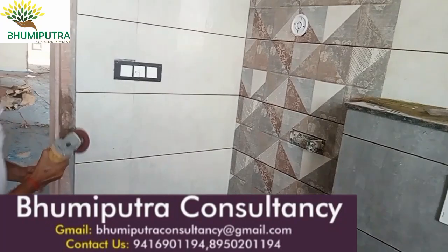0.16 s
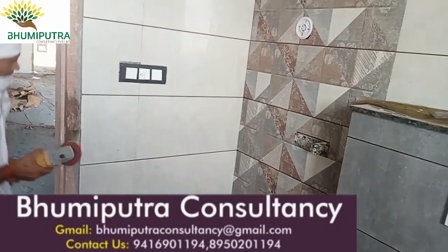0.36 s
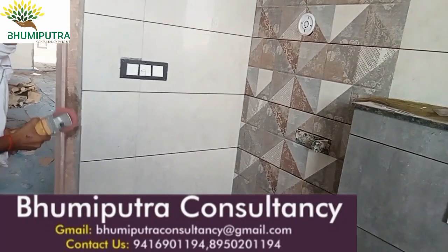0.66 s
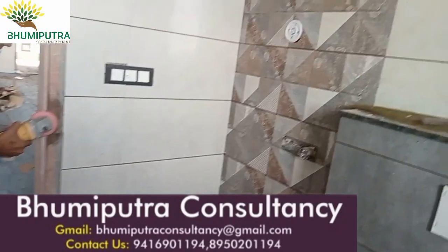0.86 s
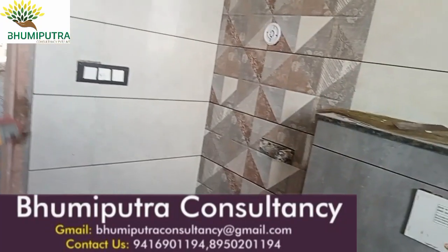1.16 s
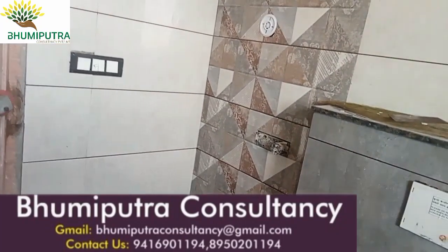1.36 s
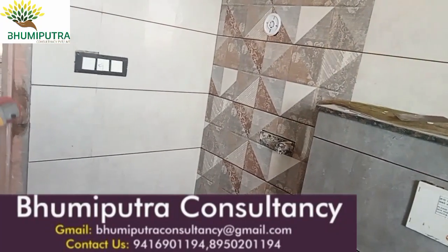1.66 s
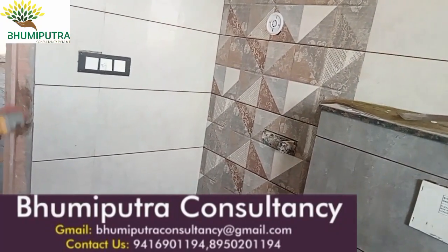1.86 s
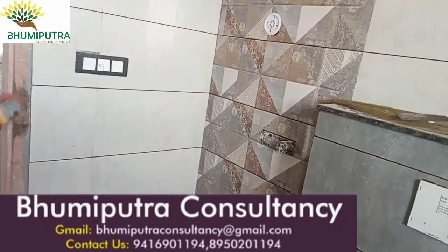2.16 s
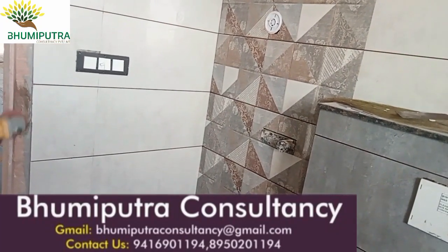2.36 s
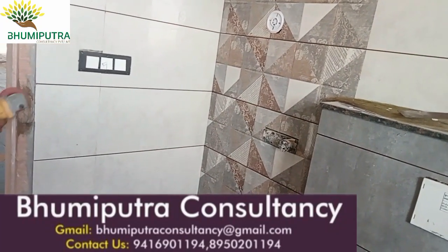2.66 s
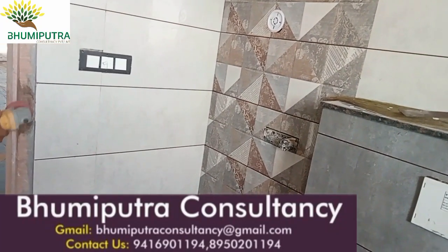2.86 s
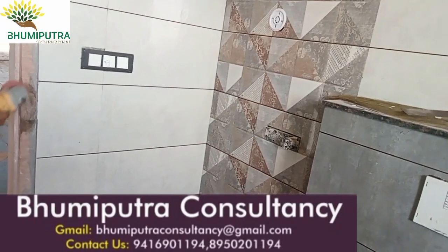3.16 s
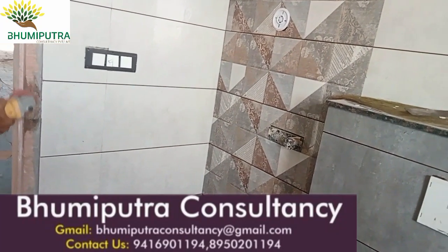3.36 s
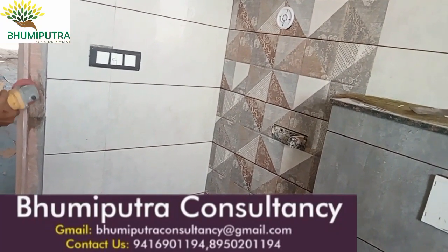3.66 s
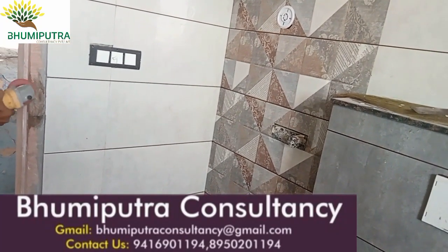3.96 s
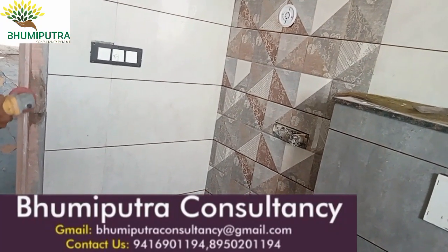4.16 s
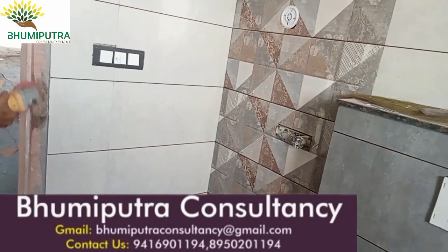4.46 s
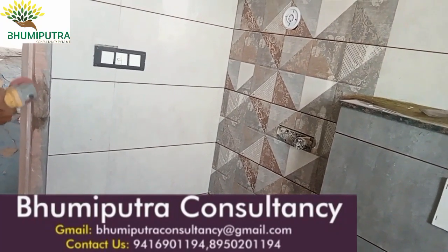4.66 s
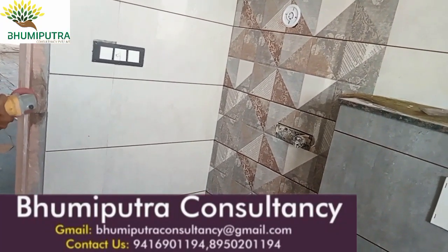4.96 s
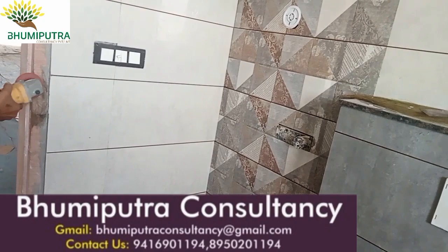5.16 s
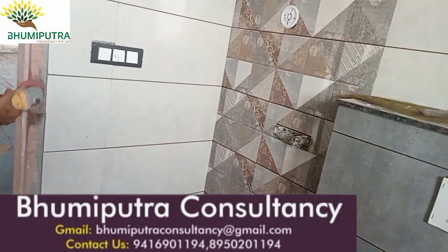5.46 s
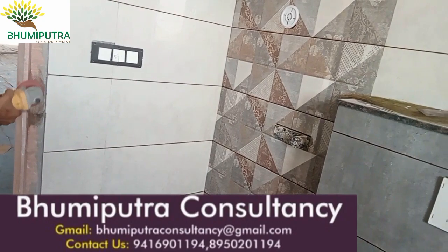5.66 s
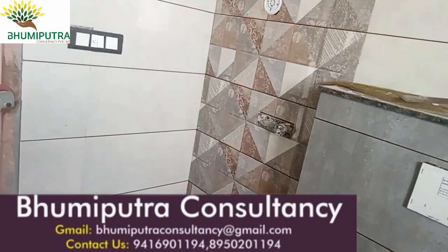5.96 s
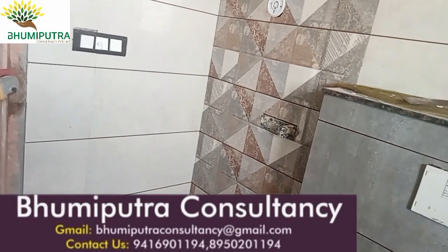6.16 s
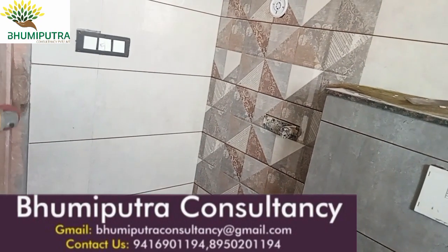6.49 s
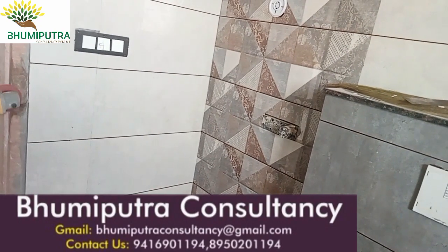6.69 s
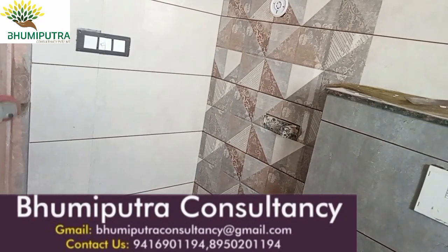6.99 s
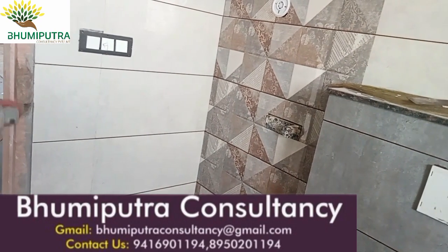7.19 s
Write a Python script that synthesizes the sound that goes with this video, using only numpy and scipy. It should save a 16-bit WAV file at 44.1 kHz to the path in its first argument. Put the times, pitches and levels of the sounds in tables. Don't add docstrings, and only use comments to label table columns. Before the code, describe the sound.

Close phone microphone in a bare tiled room. An angle grinder runs free for about a second, fan hissing under a thin high whistle, then its disc bites stone; the whistle sags and vanishes into a dense, bright, gritty hiss. Cooling air pops and flutters on the microphone, thick at first, then scattered. Near the end comes half a second of total silence, then cutting resumes abruptly.

```python
import sys
import numpy as np
from scipy import signal
from scipy.fft import rfft, irfft
from scipy.io import wavfile
from scipy.ndimage import uniform_filter1d

SR = 44100
rng = np.random.default_rng(int(sys.argv[2]) if len(sys.argv) > 2 else 0)


def volts_from_db(level):
    exponent = np.asarray(level, float) / 20
    return 10 ** exponent


def wrap_up_sound(samples):
    columns = np.atleast_2d(samples).T
    tamed = np.clip(columns, -1, 1)
    steps = np.round(tamed * 32767).astype(np.int16)
    wavfile.write(sys.argv[1], SR, steps)


N = 323253


def evened(x):
    return x / np.sqrt(np.mean(abs(x) ** 2) + 1e-20)


def read(points, hz):
    f, value = np.transpose(points)
    return np.interp(np.log(hz + 1), np.log(f + 1), value)


def curve(rows, t):
    s, value = np.transpose(rows)
    return np.interp(t, s, value)


def blurred(shape, frames, bins=1):
    field = uniform_filter1d(rng.standard_normal(shape), size=frames, axis=0)
    return evened(uniform_filter1d(field, size=bins, axis=1))


def wander(samples):
    return blurred((N, 1), frames=samples)[:, 0]


def ringing(modes, hz):
    return sum(db / (1 + (2 * (hz - f) / width) ** 2) for f, width, db in modes)


# frequency in Hz, density in dB per Hz.
FREE_SPECTRUM = [(590, -39), (1000, -10.5), (1480, -10.5), (2330, -3), (4230, -6), (5080, 0), (6460, -5.5),
                 (6990, -9), (7930, -9.5), (9200, -5.5), (9630, -8.5), (9970, -10), (12000, -17.5),
                 (13400, -11), (15400, -25)]
# frequency in Hz, density in dB per Hz.
CUT_SPECTRUM = [(590, -45), (1000, -15.5), (1330, -12.5), (1640, -12), (2310, -2.5), (2930, -5),
                (3680, -5.5), (5560, 0), (6240, -3.5), (6840, -10.5), (7660, -11.5), (8990, -8),
                (11400, -17.5), (12800, -16.5), (15400, -26)]
# frequency in Hz, density in dB per Hz.
BASS_SKIRT = [(30, -40.5), (150, -34.5), (400, -25.5), (750, -20)]
# time in seconds, share on the stone from 0 to 1.
CONTACT = [
    (0, 0),
    (1.22, 0.25),
    (1.58, 1),
    (7.33, 1),
]
# frequency in Hz, width in Hz, height in
# dB (negative for a dip).
DISC_RINGS = [(1315, 21, 6.5), (2400, 120, 1), (4210, 120, -2.5), (5620, 87, 3.5), (6014, 80, 3.5),
              (8800, 200, 3), (10130, 830, 3), (13100, 1300, 2.5), (15500, 380, 10.5)]
# frequency in Hz, width in Hz, height in dB.
FREE_HUMPS = [(14150, 700, 2.5), (15400, 400, 6.5)]
# time in seconds, hiss level in dB.
HAND_PRESSURE = [(0.3, -17.5), (0.64, -18.5), (1.12, -16.5), (1.3, -18.5), (1.65, -16), (2.35, -17),
                 (3.02, -17), (3.38, -18), (3.5, -16), (3.76, -18), (3.96, -17), (4.5, -17), (5.1, -17),
                 (5.32, -18), (6.11, -15.5), (6.24, -19), (6.65, -17), (7.33, -18)]


def hiss(room=0.46, patchy_db=1.0, grit_db=0.17, tremor_db=0.38, middle_db=-18):
    hop = 512
    shape, hz = (N // hop + 5, 1025), np.fft.rfftfreq(2048, 1 / SR)
    t = np.arange(shape[0]) * hop / SR
    level_db = curve(HAND_PRESSURE, t)[:, None] + tremor_db * blurred((len(t), 1), frames=6)
    push_db = level_db - middle_db
    contact = curve(CONTACT, t)[:, None]
    free = 1 - contact
    free_db = read(BASS_SKIRT + FREE_SPECTRUM[1:], hz) + ringing(FREE_HUMPS, hz)
    cut_db = read(BASS_SKIRT + CUT_SPECTRUM[1:], hz) + ringing(DISC_RINGS, hz)
    colour_db = free * free_db + contact * cut_db

    body, fine = read([(3200, 1), (4200, 0)], hz), read([(6500, 0), (8000, 1)], hz)
    moving_db = body * (-0.5 * free - 0.57 * push_db)
    moving_db = moving_db + fine * (-0.1 * free - 0.35 * push_db)
    moving_db += fine * blurred(shape, frames=5, bins=160)

    drift = blurred(shape, frames=14, bins=2) + 1j * blurred(shape, frames=14, bins=2)
    echoes = abs(1 + room * (1 - 0.24 * fine) * drift)
    z = (rng.standard_normal(shape) + 1j * rng.standard_normal(shape)) * echoes
    z *= volts_from_db(colour_db + moving_db + patchy_db * blurred(shape, frames=8, bins=25))
    main = (hz > 4000) & (hz < 6500)
    share = np.sum(abs(z[:, main]) ** 2) / np.sum(abs(z) ** 2)
    sound = evened(signal.istft(z.T, nperseg=2048, noverlap=2048 - hop)[1][:N]) / np.sqrt(share)

    shake_db = grit_db * wander(300)
    return sound * volts_from_db(np.interp(np.arange(N) / SR, t, level_db[:, 0]) + shake_db)


def resonate(x, hz, width):
    turn, r = np.exp(2j * np.pi * np.cumsum(hz) / SR), np.exp(-np.pi * width / SR)
    return 2 * (turn * signal.lfilter([1 - r], [1, -r], x / turn)).real


# multiple of the whistle pitch, level in dB.
GEAR_TONES = [(.955, -8), (.916, -11), (.751, -9), (.712, -8), (.598, -11), (1.36, -18)]
# time in seconds, level in dB.
WHISTLE_LEVEL = [(0, -27), (.08, -21.5), (.25, -23.5), (.39, -33), (.5, -24), (.63, -18.5), (.8, -22),
                 (1.2, -27), (1.6, -34)]
WHISTLE_NULLS = [.14, .36, .715, .79, .86, .955, 1.15, 1.25, 1.33, 1.39]


def motor(gear_width=18, bite_s=1.13, quiet_s=1.6):
    t = np.arange(N) / SR
    loaded_s = np.clip(t - bite_s, 0, quiet_s - bite_s)
    hz = 9526 - 116 * np.exp(-t / .25) - 1500 * loaded_s ** 1.5
    contact = curve(CONTACT, t)
    noise = rng.standard_normal(N)
    fuzz = .12 + .6 * contact
    tone = np.sqrt(2) * np.sin(2 * np.pi * np.cumsum(hz) / SR)
    tone += fuzz * evened(resonate(noise, hz, 35))
    for s in WHISTLE_NULLS:
        tone *= np.tanh((t - s) / .018)
    gears = np.zeros(N)
    for multiple, db in GEAR_TONES:
        come_and_go = volts_from_db(db + 2.5 * wander(6000))
        gears += come_and_go * evened(resonate(noise, multiple * hz, gear_width))
    alive = np.clip((quiet_s - t) / .05, 0, 1)
    return alive * (volts_from_db(curve(WHISTLE_LEVEL, t) + .8) * tone + volts_from_db(-25) * (1 - contact) * gears)


# start in seconds, length in seconds, level in dB.
GUSTS = [(0.0, 0.51, -24), (0.604, 0.17, -24), (.8, .05, -35.5), (.895, 0.04, -40.5), (1.062, .06, -35.5),
         (1.143, .12, -23.5), (1.304, 0.097, -24.5), (1.44, .13, -28.5), (2.05, .06, -34.5),
         (2.347, 0.021, -30), (2.444, 0.22, -25.5), (2.8, 0.024, -34.5), (2.998, 0.046, -24.5),
         (3.103, .17, -32.5), (3.39, 0.028, -32), (3.442, 0.23, -23), (3.8, 0.085, -30.5),
         (3.937, 0.099, -32), (4.09, 0.028, -38), (4.276, 0.13, -28), (4.677, 0.032, -23.5),
         (4.754, .1, -38.5), (5.084, .14, -30), (5.425, 0.074, -28.5), (6.01, 0.09, -31),
         (6.131, 0.034, -24.5), (6.337, 0.04, -31), (6.438, .09, -30), (6.538, 0.076, -23),
         (6.919, 0.088, -30.5)]
# time in seconds, level in dB.
BREEZE = [(0, -25.5), (1.55, -40), (1.75, -37), (2.3, -41.5), (3.2, -38.5), (3.75, -43), (4.0, -36),
          (4.2, -46), (4.55, -37.5), (5.2, -45), (5.3, -51), (5.45, -35.5), (6.15, -41), (6.22, -56),
          (6.4, -37), (6.7, -46), (6.85, -58), (7.33, -58)]


def gusting(t, rise_s=0.004, fall_s=0.0092, lumps_db=2.2):
    power = volts_from_db(2 * curve(BREEZE, t))
    for s, length, db in GUSTS:
        edge = np.minimum((t - s) / rise_s, (s + length - t) / fall_s)
        power = power + volts_from_db(2 * db) * np.exp(-np.minimum(edge, 0) ** 2)
    return np.sqrt(power) * volts_from_db(lumps_db * wander(1400) - 0.5)


def bump(fall_ms, rise_ms=.17):
    u = np.arange(-100, 400) / SR * 1000
    return np.where(u < 0, np.exp(-.5 * (u / rise_ms) ** 2), np.exp(-(abs(u) / fall_ms) ** 2.3))


def eddy(scale, fall_ms=1.0):
    return bump(fall_ms * scale ** 1.3, .17 * scale) + .8 * bump(.2, .09)


# time in seconds, signed peak pressure, size factor.
POPS = [(0.154, 0.18, 1.4), (0.2328, -0.27, 0.6), (0.4542, -0.29, 2.3), (0.7442, -0.2, 0.9),
        (0.8105, 0.18, 0.63), (1.1436, 0.094, 1.0), (1.19, -0.39, 1.5), (1.2389, 0.31, 1),
        (1.3505, -0.23, 1.8), (1.393, 0.21, 1.4), (1.545, -0.19, 2), (2.09, 0.17, 1.8),
        (2.3537, 0.079, 1.1), (2.5345, -0.57, 0.5), (2.629, 0.28, 1.3), (3.0304, 0.11, 0.89),
        (3.398, 0.2, 1.4), (3.47, 0.41, 1.0), (3.6496, -0.37, 1.1), (3.811, 0.18, 2), (4.3042, 0.3, 1.3),
        (4.37, 0.29, 2.4), (4.6922, -0.21, 1.9), (5.127, 0.25, 0.8), (5.4908, 0.2, 1.1), (6.147, 0.22, 1.2),
        (6.543, 0.34, 0.72), (6.5963, 0.26, 1.5), (6.965, 0.3, 1.6), (7.097, 0.12, 1.0)]
# time in seconds, signed peak
LONE_POPS = [(.009, 0.36), (.0726, .19), (.3468, -0.21), (.4094, 0.27), (0.5208, 0.048), (6.4422, .12),
             (6.6097, 0.17), (0.9168, 0.13), (1.0654, 0.071), (1.4824, 0.068), (1.6, 0.11), (1.832, -0.072),
             (1.888, 0.057), (2.058, 0.079), (2.2582, 0.047), (2.451, 0.033), (2.8138, 0.1), (2.931, 0.063),
             (3.2413, 0.09), (3.2672, 0.071), (3.69, -0.17), (3.869, .13), (3.8926, .13), (4.0034, -0.11),
             (4.0951, 0.12), (4.761, 0.082), (4.828, 0.081), (5.2003, .11), (5.4386, 0.13), (6.0795, 0.12)]
EDDY_SIZES = (.65, .95, 1.25, 1.6)


def draught(per_s=400, spread_db=3.0, small_db=-4, eddies_per_s=90, eddy_spread_db=3.0, eddy_db=-3,
            uneven_db=5, vent_hz=85, cut_hz=55, slow_lag=0.32, lone_size=1.2):
    air = gusting(np.arange(N) / SR)
    chance, kind = rng.random(N), rng.random(N)
    signs = np.where(rng.random(N) < .6, 1., -1.)
    size = np.minimum(rng.exponential(1, N), 2.2)

    train = (chance < per_s / SR) * signs * volts_from_db(spread_db * size)
    sharp = signal.oaconvolve(train * (kind < .7), bump(0.32, 0.059))[:N]
    slow_train = train * evened(air ** -slow_lag) * (kind >= .7)
    small = sharp + .6 * signal.oaconvolve(slow_train, bump(3.7, 0.93))[:N]

    shed = np.cumsum(eddies_per_s / SR * volts_from_db(uneven_db * wander(300)))
    train = (np.diff(np.floor(shed), prepend=0) > 0) * signs * volts_from_db(eddy_spread_db * size)
    group = (kind * len(EDDY_SIZES)).astype(int)
    common = np.zeros(N)
    for k, scale in enumerate(EDDY_SIZES):
        common += signal.oaconvolve(train * (group == k), eddy(scale))[:N]

    big = np.zeros(N + 500)
    for s, peak, scale in POPS + [(s, peak, lone_size) for s, peak in LONE_POPS]:
        big[round(s * SR):][:500] += peak * eddy(scale)

    vent = signal.butter(2, vent_hz, "high", fs=SR, output="sos")
    loose = volts_from_db(small_db) * evened(signal.sosfilt(vent, small))
    loose += volts_from_db(eddy_db) * evened(signal.sosfilt(vent, common))
    rumble = signal.sosfilt(vent, big[100:N + 100]) + air * loose
    return signal.lfilter(*signal.butter(2, cut_hz, "high", fs=SR), rumble)


def scene():
    mono = hiss() + motor() + draught()
    return np.array([mono, mono])


# centre time in seconds, low edge in Hz, high edge in Hz.
STRAY_BANDS = [(0.025, 11025, 12446), (0.859, 11670, 13135), (0.926, 4608, 5727), (0.928, 12403, 13824),
               (1.442, 5081, 7622), (1.443, 9603, 11068), (1.789, 5081, 6330), (2.071, 13092, 14513),
               (2.138, 4608, 5770), (2.139, 10335, 11670), (2.693, 10981, 12403), (3.09, 4565, 5770),
               (3.462, 8914, 10379), (3.88, 13135, 14470), (3.926, 8225, 9689), (4.181, 13049, 14470),
               (4.182, 4177, 5211), (4.412, 10292, 12403), (5.367, 8225, 9689), (5.494, 4651, 6373),
               (6.55, 8914, 10379), (6.552, 10981, 12403)]


def stray_bands(x):
    frame, hz = np.hanning(2048), np.fft.rfftfreq(2048, 1 / SR)
    for s, low_hz, high_hz in STRAY_BANDS:
        at = max(round(s * SR) - 1024, 0)
        part = rfft(x[0, at:at + 2048] * frame) * ((hz > low_hz) & (hz < high_hz))
        apart = irfft(part * np.exp(2j * np.pi * rng.random(len(hz)))) * frame
        x[:, at:at + 2048] += 1.5 * np.outer([1, -1], apart)
    return x


def band_limit(x):
    return signal.sosfilt(signal.butter(12, 15530, fs=SR, output="sos"), x)


# start in seconds, end in seconds.
DROPOUT = (5.5222, 6.0109)


def record(dry):
    t = np.arange(N) / SR
    soft = dry / (1 + (abs(dry) / .82) ** 3) ** (1 / 3)
    low_pass = signal.firwin(801, 15500, window=("kaiser", 8), fs=SR)
    soft = stray_bands(signal.oaconvolve(soft, low_pass[None], "same"))
    live = soft * ((t < DROPOUT[0]) | (t > DROPOUT[1]))
    return band_limit(live)


dry = scene()
out = record(dry)
wrap_up_sound(out)
```